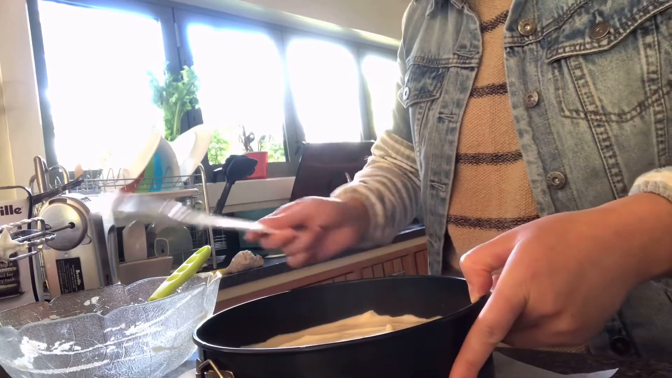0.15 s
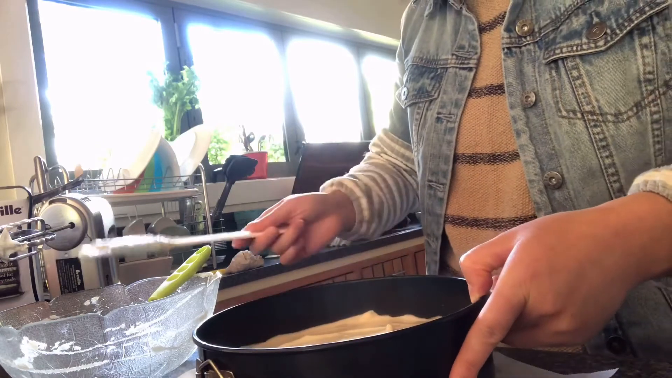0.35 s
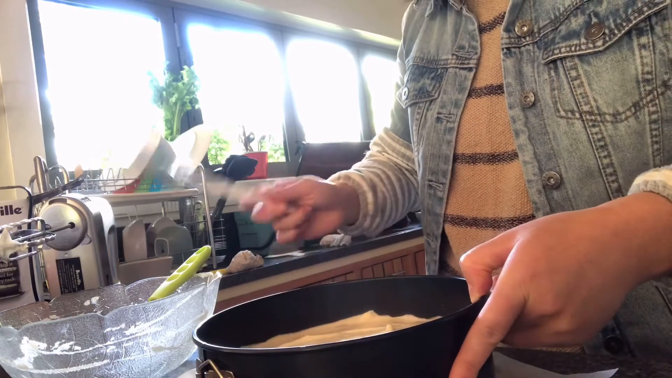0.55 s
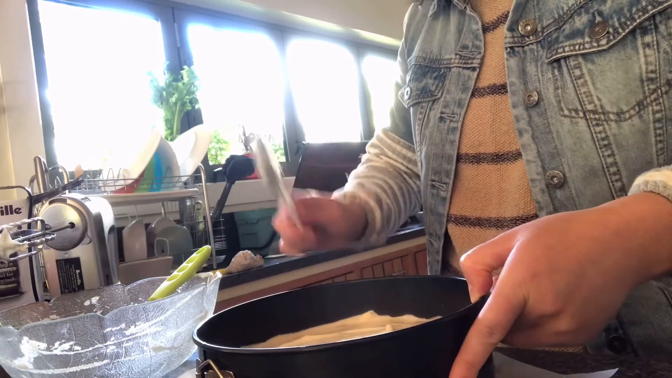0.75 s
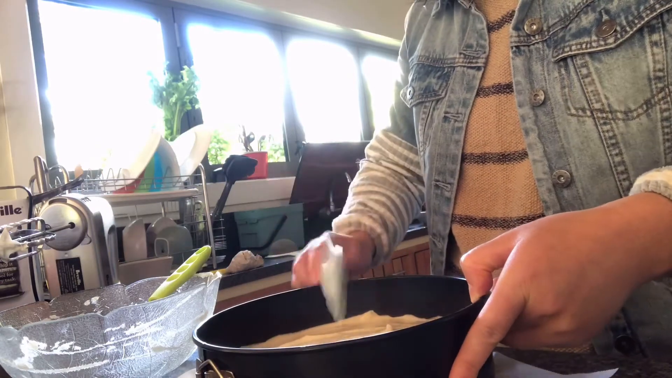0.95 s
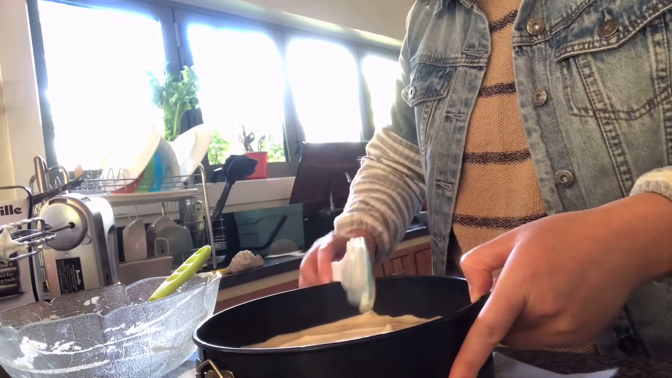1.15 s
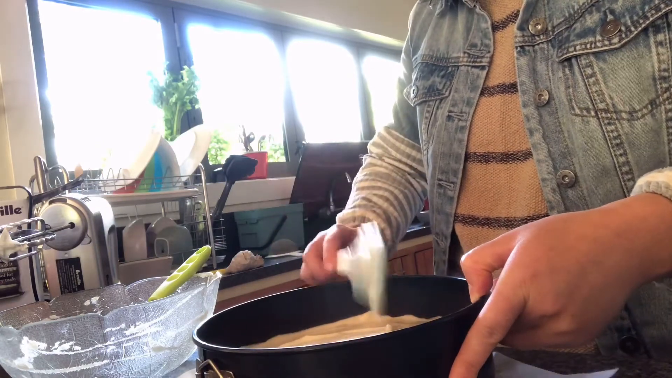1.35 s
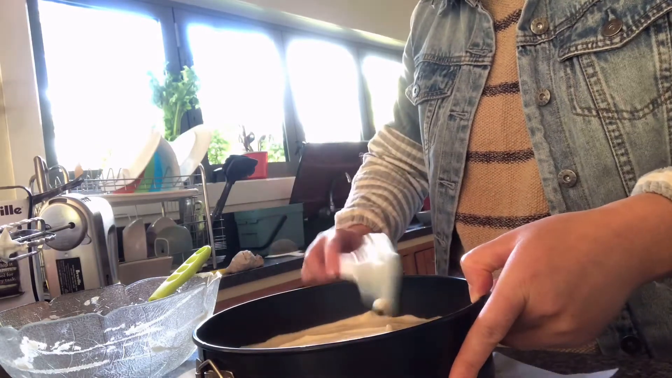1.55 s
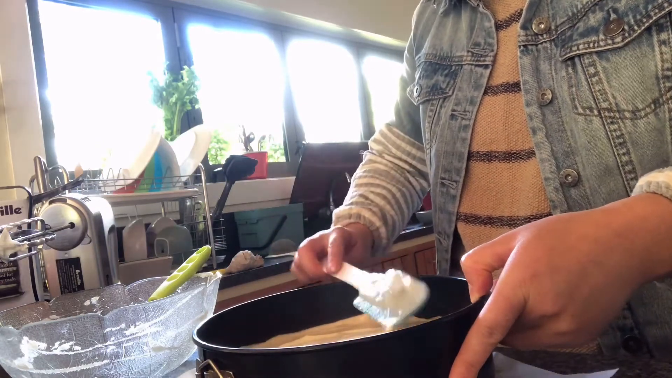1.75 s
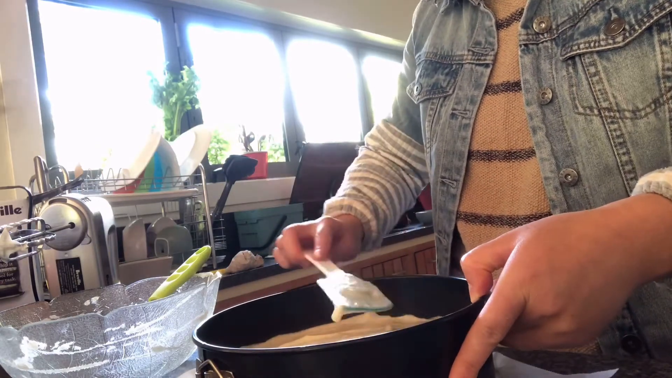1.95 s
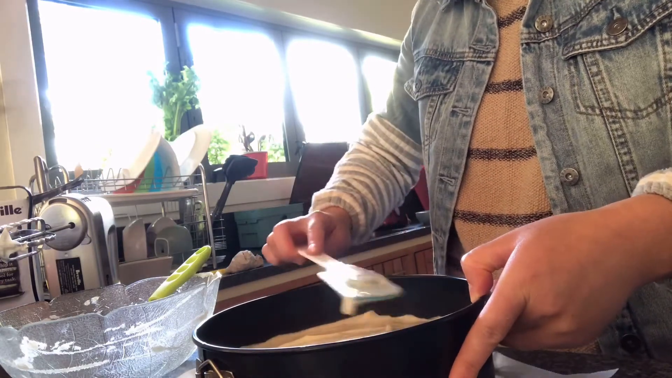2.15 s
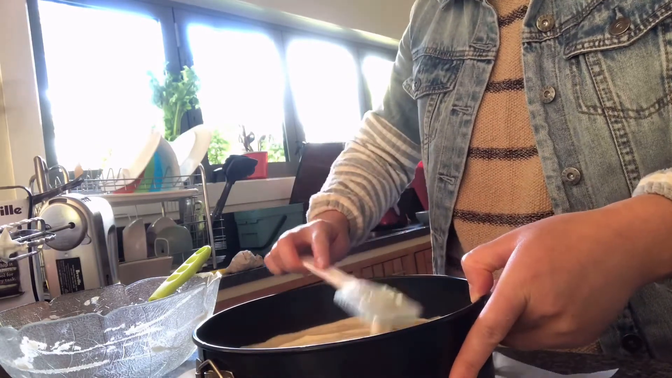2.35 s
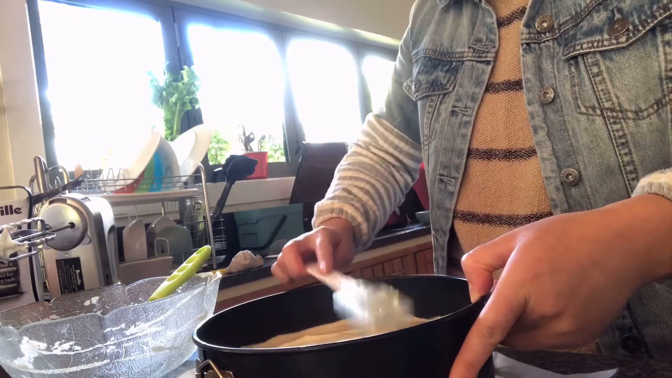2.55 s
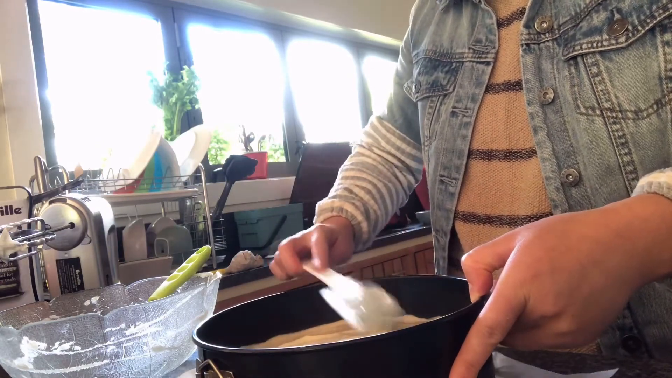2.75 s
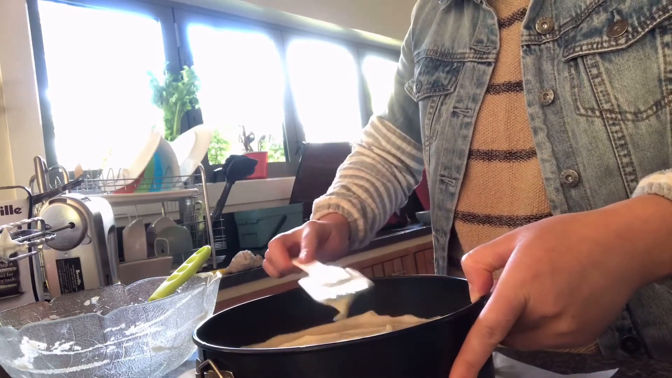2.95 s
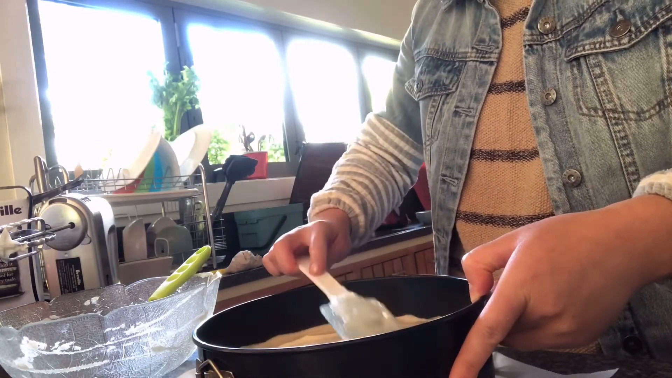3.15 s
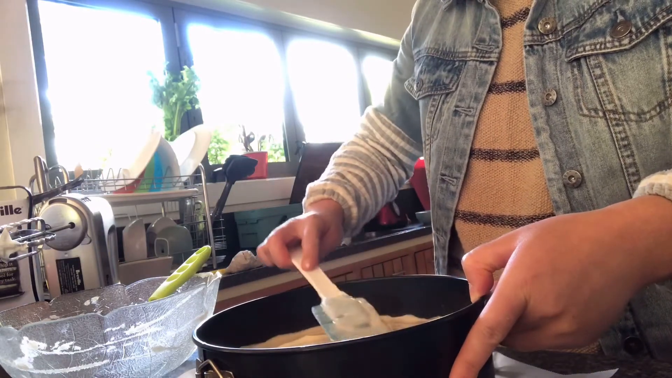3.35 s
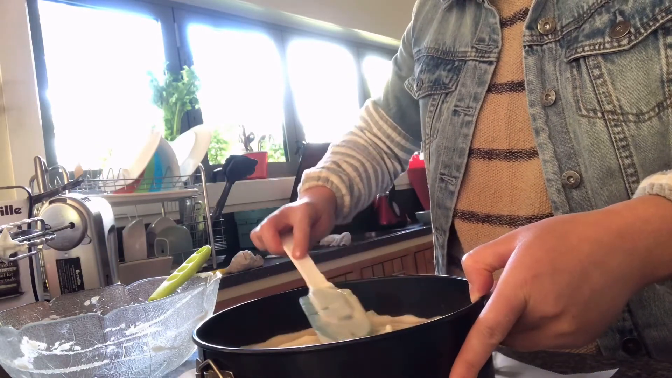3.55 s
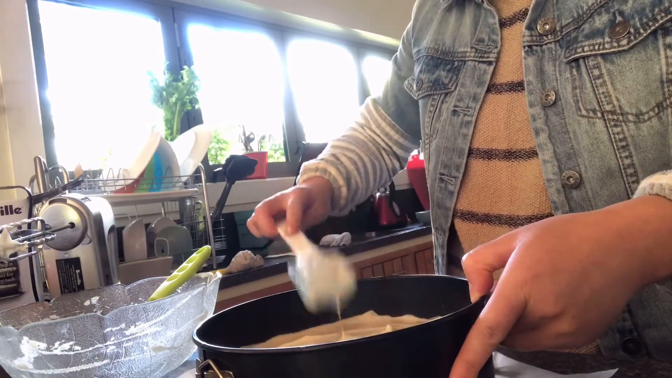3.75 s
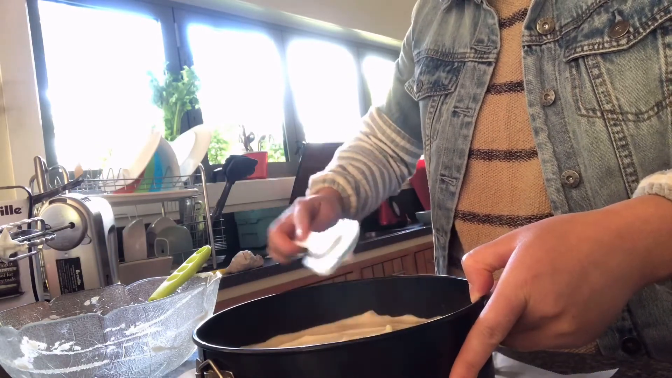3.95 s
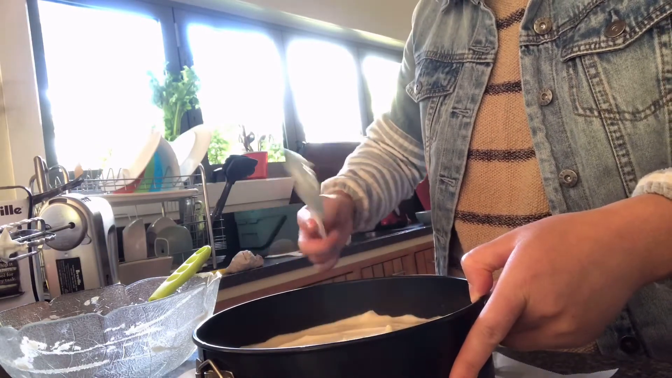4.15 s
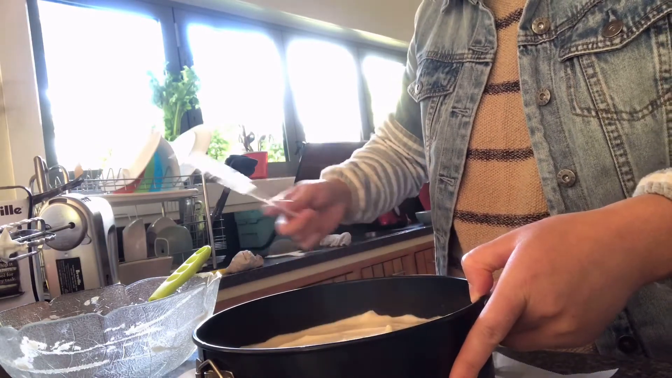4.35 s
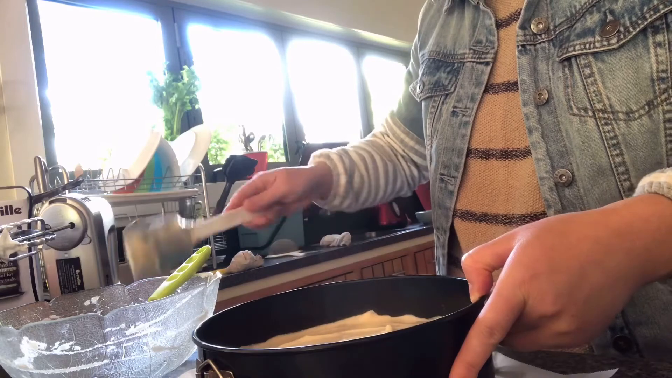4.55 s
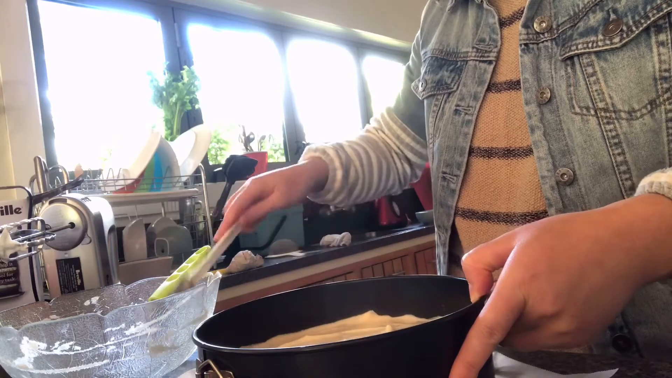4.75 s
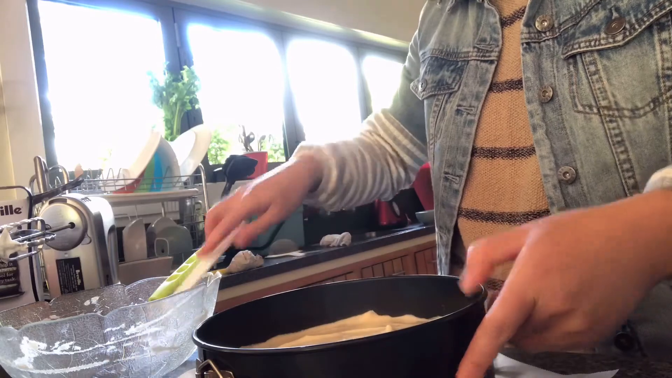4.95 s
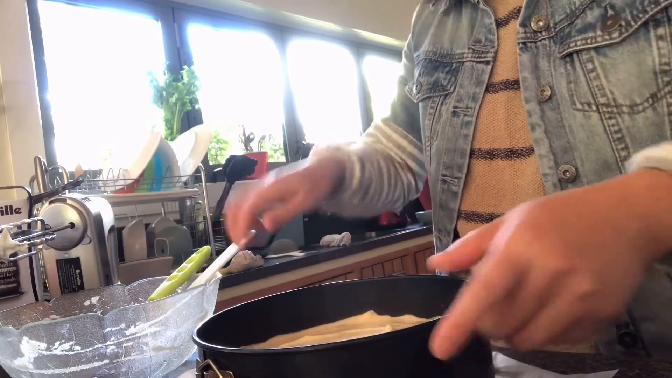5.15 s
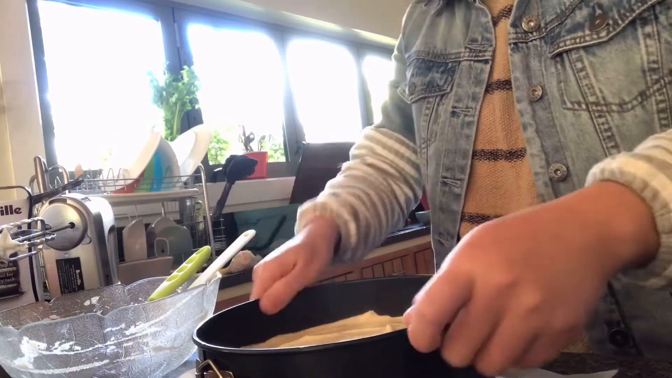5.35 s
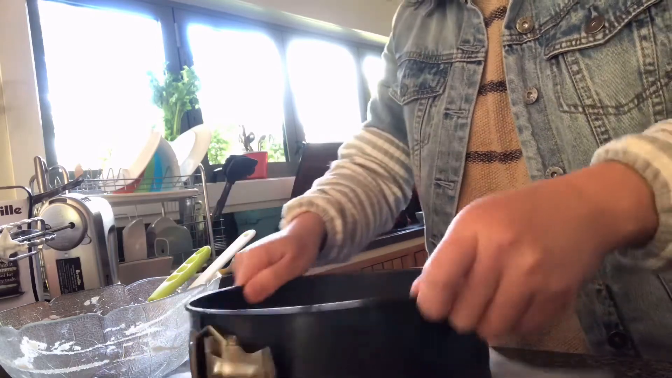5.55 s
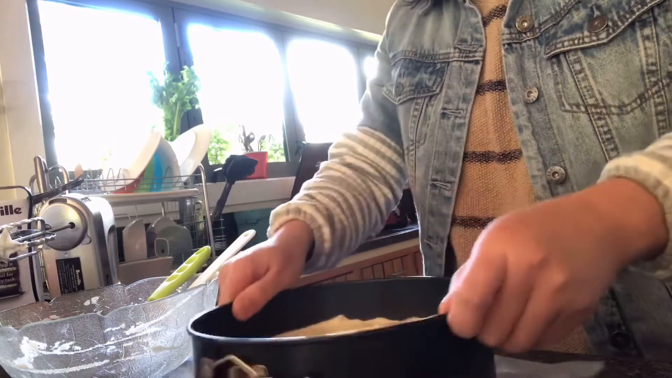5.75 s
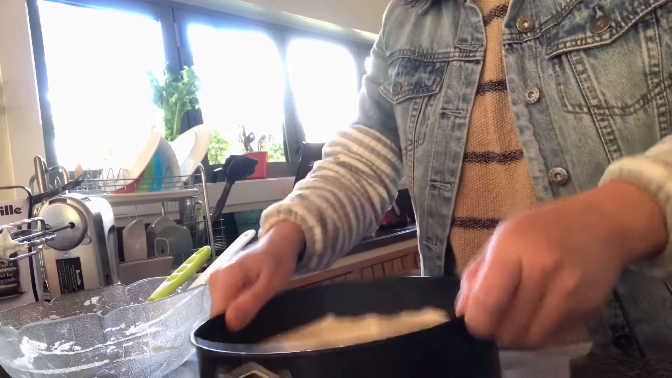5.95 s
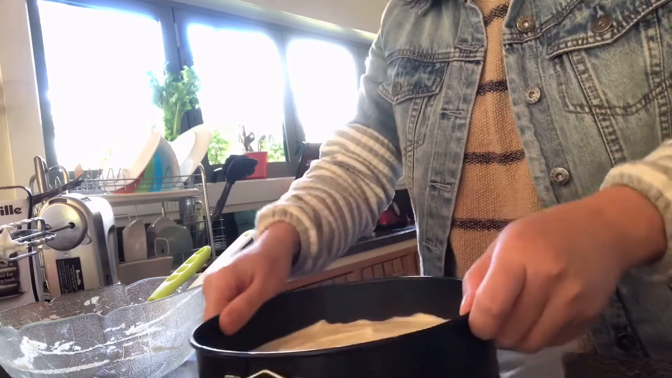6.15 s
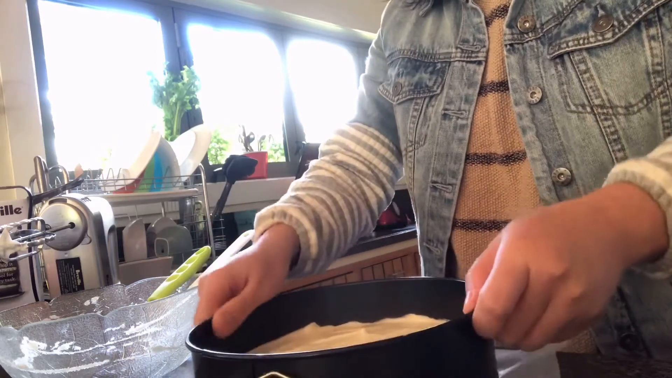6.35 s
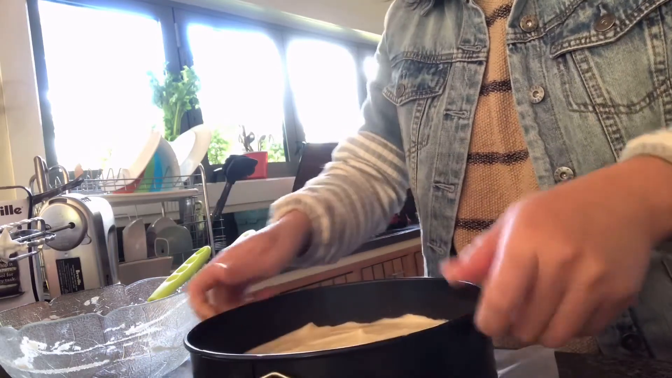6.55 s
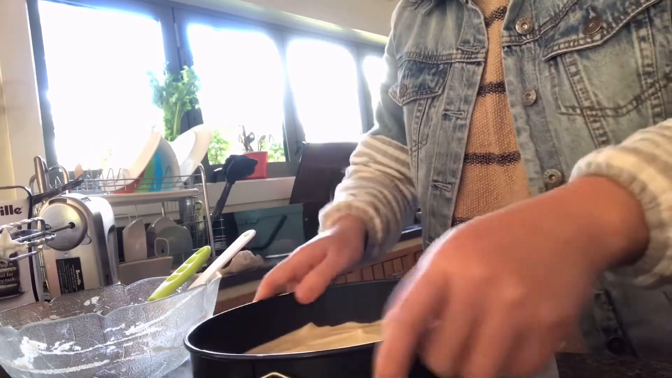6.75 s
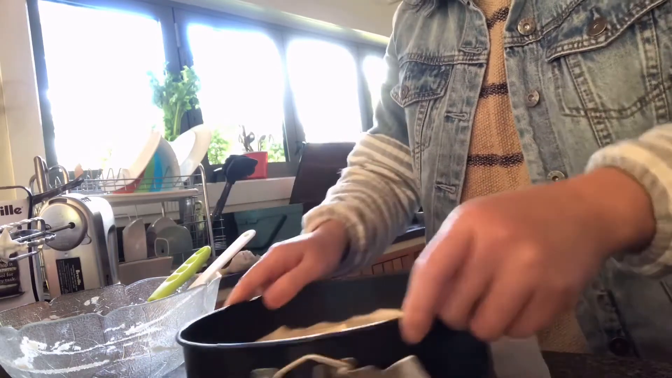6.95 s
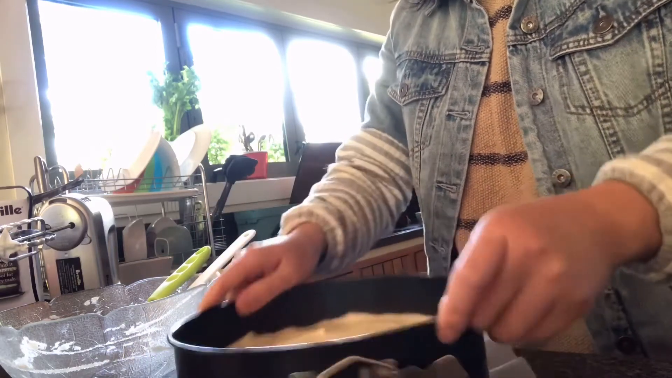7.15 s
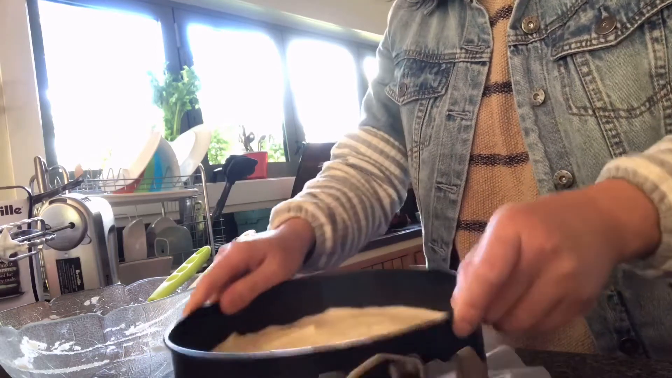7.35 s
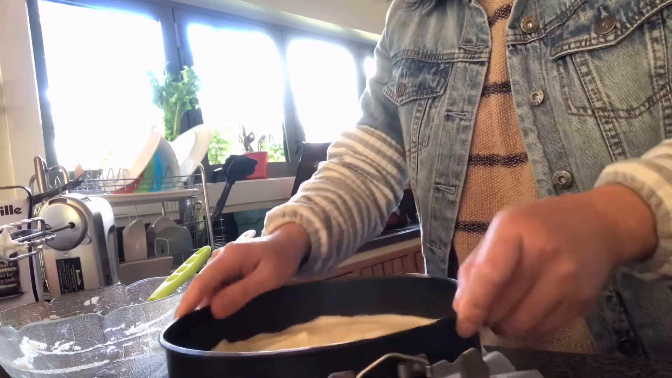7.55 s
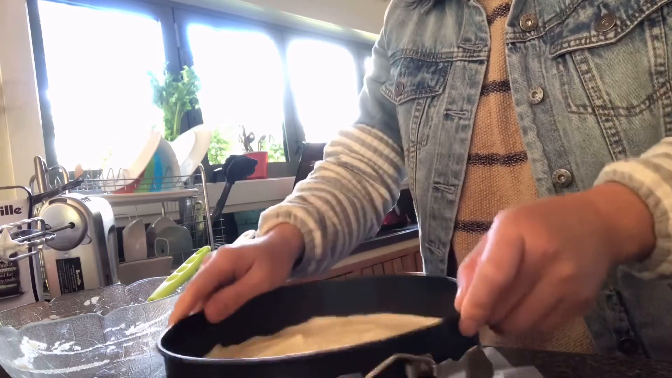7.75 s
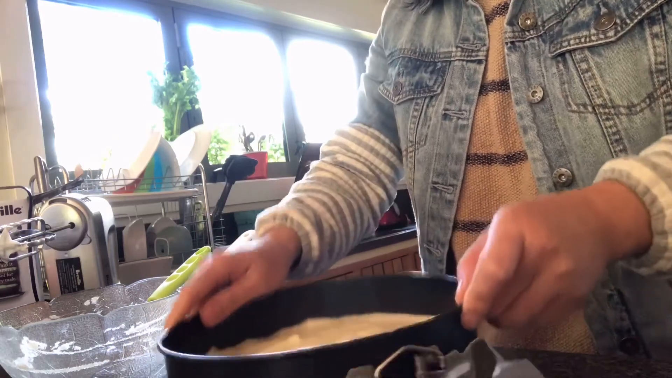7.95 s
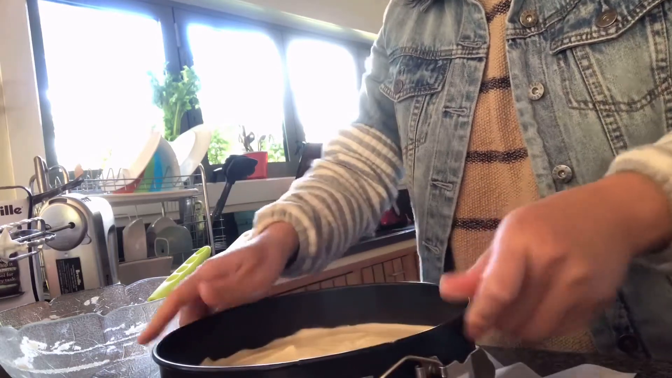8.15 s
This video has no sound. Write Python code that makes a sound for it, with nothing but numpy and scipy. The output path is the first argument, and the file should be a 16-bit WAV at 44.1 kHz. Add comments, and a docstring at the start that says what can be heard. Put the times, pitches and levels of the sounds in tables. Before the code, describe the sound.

In a small, hard-walled kitchen with a faint fridge hum, a spatula raps a batter-filled tin five times, pauses, then taps twice more, lightly. After a gap it drops into a thick glass bowl with a bright clink. The tin is dragged and banged hard on the worktop in two quick runs, baking paper crushing beneath. Close microphone, short dense echoes.

```python
"""Cake tin on a kitchen worktop

A spatula is tapped on the rim of a batter-filled cake tin and dropped into a glass bowl; then the tin is dragged
and knocked on the worktop, crushing the baking paper under it. Each blow is a push filtered by what it strikes, and
reaches the microphone as a bending wave, treble first and bass last; paper is shaped noise, glass a set of modes.
A small hard kitchen answers with dense echoes; behind it a fridge hums as wavering tones over steady air noise."""
import sys
import numpy as np
from scipy import signal
from scipy.fft import rfft, irfft
from scipy.io import wavfile
from scipy.ndimage import uniform_filter1d

SR = 44100
rng = np.random.default_rng(int(sys.argv[2]) if len(sys.argv) > 2 else 0)


def put_to_file(sound):
    """Save the sound as 16-bit audio at rate SR, in the file named by the first command-line argument."""
    columns = np.atleast_2d(sound).T  # one column per channel
    safe = np.clip(columns, -1, 1)
    whole_steps = np.round(safe * 32767)
    wavfile.write(sys.argv[1], SR, whole_steps.astype(np.int16))


def to_linear_factor(level_db):
    """Convert decibel levels (scalar or array-like) to linear amplitude factors."""
    exponent = np.asarray(level_db, float) / 20
    return 10 ** exponent


N = 365588
TIME = np.arange(N) / SR


def gain_at(hz, spectrum):
    """Gain of a (frequency [Hz], level [dB]) spectrum at the given frequencies."""
    f, db = np.transpose(spectrum)
    return to_linear_factor(np.interp(np.log(hz + 1), np.log(f), db))


def noise(spectrum, size=N):
    """Coloured noise of rms 1."""
    white = rng.standard_normal(size)
    x = irfft(rfft(white) * gain_at(np.fft.rfftfreq(size, 1 / SR), spectrum), size)
    return x / np.std(x)


def walk(rate):
    """Random levels of spread near 1, a new one every 1 / rate s, joined by straight slopes."""
    hold = int(SR / rate)
    steps = np.repeat(rng.standard_normal(N // hold + 1), hold)
    return uniform_filter1d(steps, hold)[:N]


def modes(hz, table, gains):
    """Frequency response of struck modes, each starting at its own strength."""
    f, db, t60 = np.transpose(table)[:, :, None]
    damp = np.log(1000) / t60 / (2 * np.pi)
    return np.sum(gains[:, None] * to_linear_factor(db) * f / (f ** 2 + (damp + 1j * hz) ** 2), axis=0)


def push(hz, contact_ms, rebound_db):
    """A softer contact is a longer, duller push; a springy one stresses the pitch of its own length."""
    r = hz * contact_ms / 1000
    return 1 / np.sqrt((1 - r ** 2) ** 2 + (r / to_linear_factor(rebound_db)) ** 2)


def travel(hz, lag, chance, edge_db=-3.5, edge_step_db=-4.5):
    """Bending waves, delayed by lag / sqrt(frequency): the direct one, then weaker returns by longer paths."""
    paths = 1 + np.cumsum(0.4 + 1.2 * chance)  # lengths relative to the direct path
    gains = np.cos(40 * chance) * to_linear_factor(edge_db + edge_step_db * np.arange(len(chance)))
    wave = -4j * np.pi * lag * np.sqrt(hz)
    return np.exp(wave) + gains @ np.exp(paths[:, None] * wave)


def rattle(size, ms):
    """Response of a contact that chatters briefly instead of striking once."""
    return rfft(rng.standard_normal(size) * np.exp(-TIME[:size] * 1000 / ms))


def add(out, s, response, peak_db, size):
    """Adds the impulse response of a spectrum at time s, starting a little early for the rise of the push."""
    hz, lead = np.fft.rfftfreq(size, 1 / SR), 256
    start = int(s * SR)
    delay = lead + s * SR - start  # in samples, with the fraction
    pulse = irfft(response * np.exp(-2j * np.pi * hz * delay / SR), size)
    piece = out[start - lead:start - lead + size]
    piece += (pulse * to_linear_factor(peak_db) / np.max(np.abs(pulse)))[:len(piece)]


# ringing modes of the worktop, before spot and load shift them: (frequency [Hz], level [dB], t60 [s])
WORKTOP_MODES = [(84, -17, 0.059), (111.4, 5, .09), (192, -13, 0.24), (275, -2.5, 0.13), (349.6, -4.5, .06),
                 (544, 0, 0.017), (694, -33, 0.037), (1092, -4, 0.037), (1900, -20, 0.016)]
# colour of the wave that runs through the slab: (frequency [Hz], level [dB])
SLAB_WAVE = [(40, -38), (80, -14.5), (200, 8), (500, 5), (1000, 2), (2000, 5), (4000, -21.5), (9000, -16.5)]


def worktop(blows, rebound_db, ring=56.0):
    """Each blow runs through the slab, which then rings briefly; spot and load change its modes a little."""
    out, size = np.zeros(N), 8192
    hz = np.fft.rfftfreq(size, 1 / SR)
    booms = np.transpose(WORKTOP_MODES)[0] < 150  # modes that the boom level [dB] raises
    spot_db, spot_detune = 3, 0.05
    hard_db, rebound_per_db = -4.5, 0.9  # blows above this level spring back more
    spots = rng.standard_normal((len(blows), len(WORKTOP_MODES) + 1))
    edges = rng.random((len(blows), 5))
    for (s, db, contact_ms, boom_db, lag), spot, edge in zip(blows, spots, edges):
        strengths = to_linear_factor(spot_db * spot[:-1] + booms * boom_db)
        ringing = modes(hz * (1 + spot_detune * spot[-1]), WORKTOP_MODES, strengths)
        slab = gain_at(hz, SLAB_WAVE) + ring * ringing
        strike = push(hz, contact_ms, rebound_db + rebound_per_db * max(db - hard_db, 0))
        add(out, s, strike * slab * travel(hz, lag, edge), db, size)
    return out


SLAB_LAG = 0.1  # bass lag of blows on the worktop [s*sqrt(Hz)]
# the tin's edges landing on the worktop:
# (time [s], peak level [dB], contact [ms], boom level [dB], crushed paper level [dB])
LANDINGS = [(5.6904, -15.5, 3.86, -9, -27), (5.78, -26.5, 4.3, 1, -54.5), (5.8269, -8, 2, -10.5, -23),
            (5.9858, -4, 2.26, -9.5, -19), (5.9939, -5, 1.15, 1.5, -21), (6.1562, -1.2, .9, -25, -19),
            (6.1711, -11, 1.6, 3.5, -24.5), (6.3507, -5.5, 2.14, -9, -19), (7.0192, -12.5, 1.17, -14, -28),
            (7.032, -7, 1.76, -0.5, -16), (7.0523, -18, 1.5, -6, -27), (7.218, -10, 2.4, 2.5, -21.5),
            (7.4089, -5, 1.98, -16, -21), (7.4255, -17.5, 1.43, -12, -33), (7.4355, -16, 2.5, -12, -27.5),
            (7.6157, -7, 1.19, -15, -29), (7.628, -15, 2.3, 2, -36), (7.6346, -12, 1.94, 1.5, -33),
            (7.6407, -17, 0.71, 1, -24.5), (7.8114, -6.5, 2.18, -12, -24), (7.825, -15.5, 0.82, 3, -26),
            (7.8336, -26.5, 2.2, 10, -37), (8.0096, -.6, .92, -8, -19), (8.0199, -9, 2.1, 0, -23.5)]


def landings():
    """The tin's edges strike the worktop, each with its own contact length and boom."""
    return worktop([(*row[:-1], SLAB_LAG) for row in LANDINGS], 3)


# colour of crushed paper: (frequency [Hz], level [dB])
PAPER = [(300, -18.5), (1000, 1.5), (2000, -1), (4000, -1.5), (7000, -3), (11000, -4), (16000, -10)]
# paper creasing around a landing or snapping free as the tin lifts:
# (time [s], level [dB], rise and halving time [ms], treble level [dB])
SNAPS = [(5.523, -38.5, 2.4, -7.5), (5.5893, -46.5, 2.8, -15), (5.637, -59, 1.3, -6), (5.685, -34, 3, -6),
         (5.7011, -24, 1.9, 3), (5.7175, -33, 1.1, -9.5), (5.822, -28.5, 4, -3), (5.84, -27, 5, -1.5),
         (5.9797, -28.5, 1.3, -7.5), (6.153, -33.5, 2.1, -6), (6.1831, -25, 2.4, 5.5),
         (6.2273, -40, 1.8, 3.5), (6.364, -25, 6, -3), (6.762, -57, .9, 1), (7.0154, -35, 3.5, -10),
         (7.213, -26.5, 4.5, -2.5), (7.23, -27.5, 5, -2.5), (7.4023, -28.5, 1.8, -8),
         (7.443, -28.5, 3, 1.5), (7.5137, -29.5, .9, -14), (7.52, -33, 1.1, -6.5), (7.5355, -43, 2.5, -8),
         (7.612, -36, 2.5, -8), (7.6945, -44, 3, -10), (7.7203, -36, 0.79, 3), (7.7252, -29, 1.04, -16),
         (7.7388, -36.5, 2.3, -11), (7.805, -34.5, 2.8, -15.5), (7.9166, -31.5, 1.1, -17),
         (7.9321, -39.5, 3, -5.5), (8.007, -27.5, 2.5, -18)]


def crushes(grain_db=3.5, split_hz=7000.0, settle_db=-30, settle_ms=57.0):
    """Noise bursts broken into uneven grains, each burst with its own share of treble; the paper then settles."""
    x = noise(PAPER) * to_linear_factor(grain_db * walk(1500))
    x = x / np.std(x)
    low = signal.sosfilt(signal.butter(2, split_hz, fs=SR, output="sos"), x)
    out = np.zeros(N)
    late_ms, landing_rise_ms, landing_fall_ms = 2.1, 3.2, 4.2
    bursts = []
    for s, _, _, boom_db, paper_db in LANDINGS:
        # a flat, boomy landing crushes more paper at once and sounds brighter
        treble_db = -0.9 + 0.35 * boom_db
        bursts.append((s + late_ms / 1000, paper_db, landing_rise_ms, landing_fall_ms, treble_db))
    bursts += [(s, db, ms, ms, treble_db) for s, db, ms, treble_db in SNAPS]
    scatter_db = rng.standard_normal(len(bursts))  # spread of 1 dB in treble
    for (s, db, rise_ms, fall_ms, treble_db), chance_db in zip(bursts, scatter_db):
        near = slice(int((s - 0.05) * SR), int((s + 0.25) * SR))
        ms = (TIME[near] - s) * 1000
        fall = 2 ** (-np.abs(ms) / fall_ms) + to_linear_factor(settle_db) * 2 ** (-np.abs(ms) / settle_ms)
        shape = np.where(ms < 0, np.exp(-(ms / rise_ms) ** 2), fall)
        high = to_linear_factor(treble_db + chance_db) * (x - low)[near]
        out[near] += to_linear_factor(db) * shape * (low[near] + high)
    return out


# spatula taps on the rim:
# (time [s], crack peak level [dB], thud peak level [dB], crack contact [ms], bass lag [s*sqrt(Hz)])
TAPS = [(0.9843, -18.5, -19.5, 0.52, .14), (1.1284, -12.5, -9, .49, .11), (1.2925, -16, -14.5, 0.46, .125),
        (1.4453, -8.5, -4.5, 0.5, .095), (1.5973, -15.5, -13.5, .42, .115),
        (2.5461, -14.5, -24, 0.32, .078), (2.5522, -25.5, -38, .36, .08), (2.6667, -20, -28.5, 0.34, .075),
        (2.6711, -28.5, -44, .36, .08)]
# colour of the tin's wall: (frequency [Hz], level [dB])
RIM = [(400, -23), (1000, 0), (1800, -2), (3000, -2), (4800, 4.5), (6500, 15), (8000, 12.5), (10000, 10),
       (16000, 10.5)]
# batter still on the blade dulls the first tap: (frequency [Hz], level [dB])
BATTER = [(2500, 0.5), (6000, -9)]


def rim(chatter=0.07, chatter_ms=2.2):
    """The tin's wall cracks sharply, its waves running round the rim."""
    out, size = np.zeros(N), 4096
    hz = np.fft.rfftfreq(size, 1 / SR)
    rebound_db, lap_db, lap_step_db = 9, -12, -4
    for (s, db, _, contact_ms, lag), edge in zip(TAPS, rng.random((len(TAPS), 5))):
        strike = push(hz, contact_ms, rebound_db) * (1 + chatter * rattle(size, chatter_ms))
        if s == TAPS[0][0]:
            strike = strike * gain_at(hz, BATTER)
        add(out, s, strike * gain_at(hz, RIM) * travel(hz, lag, edge, lap_db, lap_step_db), db, size)
    return out


# the bowl passes the dropped spatula's blow and bounce into the worktop:
# (time [s], peak level [dB], contact [ms], boom level [dB])
BOWL_THUDS = [(5.1007, -33.5, 0.97, -12), (5.1079, -21, 1.92, -13)]


def thuds():
    """Taps and the bowl's jolts reach the worktop; a harder tap has a shorter contact."""
    late_ms, lag_share = 0.6, 0.9
    blows = []
    for s, crack_db, thud_db, _, lag in TAPS:
        contact_ms = 1.83 * to_linear_factor(0.62 * (-14 - crack_db))  # 1.83 ms at a crack of -14 dB
        boom_db = 10.5 - 110 * lag  # spots further from the microphone boom less
        blows.append((s + late_ms / 1000, thud_db, contact_ms, boom_db, lag_share * lag))
    blows += [(*row, SLAB_LAG) for row in BOWL_THUDS]
    return worktop(blows, 4)


# spatula against the glass bowl: (time [s], ring peak level [dB], clatter peak level [dB], contact [ms])
CLINK = (5.0993, -11, -10.5, 0.033)
# modes of the glass bowl: (frequency [Hz], level [dB], t60 [s])
BOWL_MODES = [(299, -6.5, .13), (728, -17, .1), (921, -8.5, .15), (1626, -6.5, .15), (2468, -4, .15),
              (3450, -9.5, .1), (4570, 3, 0.042), (4741, 2, .025), (4900, 5, .012), (5900, -19, .25),
              (5850, -7, .03), (7180, -1.5, 0.052), (7330, -3, 0.034), (8000, -8, 0.048),
              (8850, -10.5, .035), (9130, -8, .04), (10390, -13.5, .05), (10730, -2.5, .012),
              (12280, -26, .035), (13720, -25, .03)]
# colour of the blade's clatter: (frequency [Hz], level [dB])
BLADE = [(300, -12), (1200, -7), (2500, -2), (7000, -4), (11000, -18), (16000, -19)]


def bowl(clatter_ms=1.9):
    """Thick glass: a comb of clear modes, close pairs beating, under the clatter of the blade."""
    out, size = np.zeros(N), 16384
    hz = np.fft.rfftfreq(size, 1 / SR)
    s, ring_db, clatter_db, contact_ms = CLINK
    ring = modes(hz, BOWL_MODES, (-1.0) ** np.arange(len(BOWL_MODES)))
    add(out, s, ring * push(hz, contact_ms, -2.0), ring_db, size)
    add(out, s, rattle(size, clatter_ms) * gain_at(hz, BLADE), clatter_db, size)
    return out


# level of tin and paper sliding on the worktop, one list per drag: (time [s], level [dB])
SLIDES = [
    [(5.36, -66.5), (5.43, -58), (5.5, -56), (5.55, -47), (5.59, -59), (5.62, -72), (5.68, -59)],
    [(6.75, -80), (6.78, -57), (6.8, -68), (6.82, -49), (6.905, -48.5), (6.92, -54.5), (7.015, -56)],
]
# colour of the dragged paper: (frequency [Hz], level [dB])
DRAG = [(300, -21.5), (1000, -6.5), (2500, 2), (4000, 0.5), (7000, -4.5), (11000, -7.5), (16000, -8.5)]


def slide():
    """Paper hiss with scattered creases, over a lower scrape of the tin's base; a sleeve brushes once."""
    paper = noise(DRAG) * to_linear_factor(2.0 * walk(900) + 1.8 * walk(56))
    base = noise([(250, -10.0), (700, -11), (1700, -10.5), (2400, -17.5), (5000, -45)])
    rub = paper + to_linear_factor(-2) * base * to_linear_factor(4.5 * walk(90))
    out = 0
    for table in SLIDES:
        out = out + to_linear_factor(np.interp(TIME, *np.transpose(table), left=-120, right=-120)) * rub
    cloth = noise([(200, -4), (800, -2.0), (1500, -4), (2300, -13.0), (2900, -5), (3600, -10.0),
                   (4500, -26.5), (9000, -59.5)])
    sleeve_s, sleeve_db, rise_db_s, fall_db_s = 3.7, -63, 500, 130
    slope_db_s = np.where(TIME < sleeve_s, rise_db_s, fall_db_s)
    return out + cloth * to_linear_factor(sleeve_db - np.abs(TIME - sleeve_s) * slope_db_s)


# small ticks of the tin's clasp, base and the laid-down spatula, levels before roughening:
# (time [s], peak level [dB], frequency [Hz])
TICKS = [(.323, -57, 7100), (4.9612, -53, 2470), (4.9735, -43.5, 3620), (4.972, -52, 6200),
         (5.4631, -33.5, 2850), (5.4727, -43, 1900), (5.5237, -31.5, 1700), (5.5903, -42, 1950),
         (5.663, -50, 1800), (5.6903, -23.5, 1640), (5.8153, -34.5, 2530), (5.9817, -23, 2250),
         (6.0593, -30, 3000), (6.7633, -50, 1430), (6.778, -51.5, 1760), (6.817, -32.5, 1840),
         (6.8255, -34, 261), (6.8568, -36, 3200), (6.871, -40, 2100), (7.4023, -26, 3250),
         (7.5139, -22, 3370), (7.7264, -27, 3600), (7.8005, -30, 3280), (7.917, -28, 3240)]


def ticks():
    """A few cycles of one damped mode, a little rough."""
    out = np.zeros(N)
    for s, db, hz in TICKS:
        near = slice(int((s - 0.03) * SR), int((s + 0.05) * SR))
        ms = (TIME[near] - s) * 1000
        # higher ticks are shorter, as 1 / Hz squared, within limits
        length_ms = np.clip(1.9 * (1750 / hz) ** 2, 0.55, 4.9)
        shape = np.exp(-np.abs(ms / length_ms) ** np.where(ms < 0, 2, 1))
        out[near] += to_linear_factor(db) * shape * np.cos(2 * np.pi * hz * ms / 1000)
    return out * to_linear_factor(2.9 * walk(3000))


# fading of the small hard kitchen: (frequency [Hz], t60 [s])
KITCHEN_T60 = [(60, 0.62), (160, 0.52), (420, 0.51), (1100, 0.58), (2900, 0.5), (7000, 0.39), (14000, .25)]
# colour of its echoes: (frequency [Hz], level [dB])
KITCHEN_COLOUR = [(60, -10), (200, -5), (600, -3.5), (1500, -5.5), (2500, -9.5), (4500, -7.5), (6500, -6),
                  (8500, -7), (14000, -11)]


def echoes(gap_ms=1.5, build_ms=1.5):
    """Dense echoes of hard walls; every octave fades at its own rate."""
    size = 32768
    t, hz = TIME[:size], np.fft.rfftfreq(size, 1 / SR)
    t60_hz, t60_s = np.transpose(KITCHEN_T60)
    echo = 0
    for centre_hz in 45 * 2.0 ** np.arange(9):
        band = noise([(centre_hz / 2, -60), (centre_hz / 1.6, -8), (centre_hz, 0),
                      (centre_hz * 1.6, -8), (centre_hz * 2, -60)], size)
        t60 = np.interp(np.log(centre_hz), np.log(t60_hz), t60_s)
        echo = echo + band * np.sqrt(centre_hz / SR / 1000) * np.exp(-np.log(1000) * t / t60)
    echo = echo * np.clip((t * 1000 - gap_ms) / build_ms, 0, 1)
    return irfft(rfft(echo) * gain_at(hz, KITCHEN_COLOUR), size)


def kitchen(dry):
    """Hands, arms and tin keep moving, so the blend of two echo patterns shifts from blow to blow."""
    place = np.pi * walk(6)
    shares = np.cos(place), np.sin(place)
    return sum(signal.fftconvolve(dry * share, echoes())[:N] for share in shares)


# colour of the steady air noise: (frequency [Hz], relative level [dB])
AIR = [(18, -50.5), (30, -16.5), (145, -13.5), (215, -7), (245, -6), (311, -11.5), (415, -12.5),
       (499, -13.5), (616, -19), (1500, -22.5), (1860, -27.5), (4530, -34), (16000, -47)]
# the fridge's compressor tones, before they waver: (frequency [Hz], rms level [dB])
FRIDGE = [(49, -80), (97, -77.5), (146, -72.5), (247.5, -65), (280, -76.5), (490, -68), (689, -80),
          (1179, -89.5), (1335, -82)]


def fridge(waver_hz=2.8, waver_db=2.0):
    """Compressor tones that waver in pitch and level over steady air noise."""
    out = to_linear_factor(-62.5) * noise(AIR) * to_linear_factor(0.84 * walk(12))
    for hz, db in FRIDGE:
        phase = 2 * np.pi * np.cumsum(hz + waver_hz * walk(25)) / SR
        out = out + np.sqrt(2) * to_linear_factor(db + waver_db * walk(8.4)) * np.sin(phase)
    return out


def scene():
    """Blows, cracks, paper and glass, each with its share of the room, over the fridge."""
    knocks, crush = landings(), crushes()
    cracks, taps = rim(), thuds()
    glass, rub, tick = bowl(), slide(), ticks()
    near = taps + knocks + cracks + crush + glass + rub + tick
    # what each source sends into the room
    far = to_linear_factor(-7.5) * taps + to_linear_factor(-5.0) * knocks + to_linear_factor(-1.5) * cracks + to_linear_factor(-2.5) * crush
    far = far + glass + to_linear_factor(2.5) * rub + to_linear_factor(-1.5) * tick
    return (near + kitchen(far) + fridge())[None]


def band_limit(x):
    """A steep low-pass at the top of the band."""
    return signal.sosfilt(signal.butter(12, 16970, fs=SR, output="sos"), x)


def record(dry):
    """The microphone drops the deepest bass and overloads at full scale."""
    x = signal.sosfilt(signal.butter(4, 50.0, "high", fs=SR, output="sos"), dry)
    return band_limit(np.clip(x, -1, 1))


dry = scene()
out = record(dry)
put_to_file(out)
```